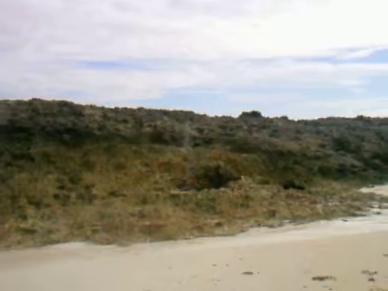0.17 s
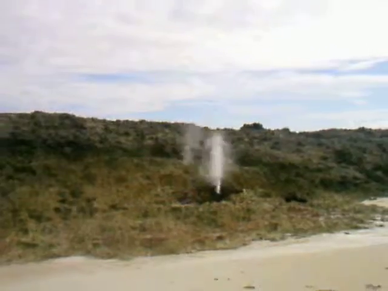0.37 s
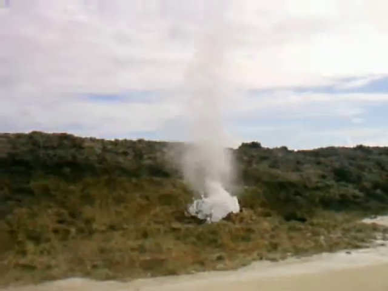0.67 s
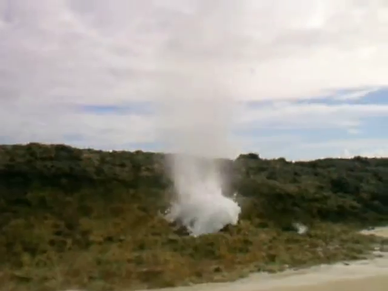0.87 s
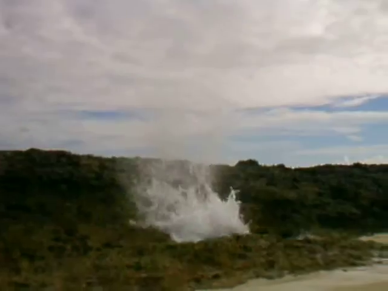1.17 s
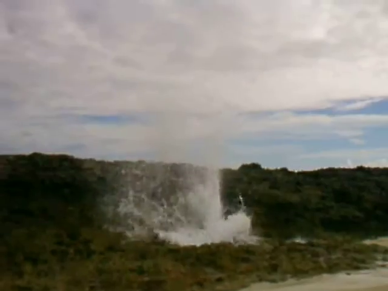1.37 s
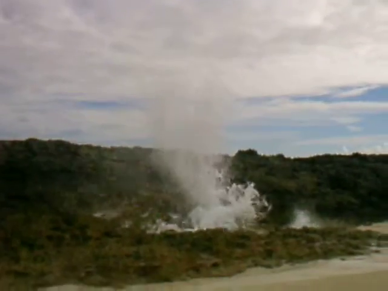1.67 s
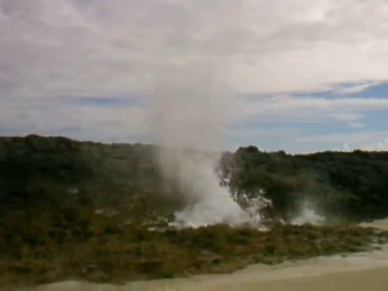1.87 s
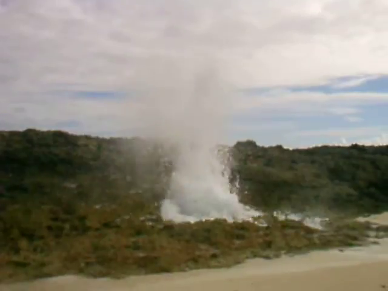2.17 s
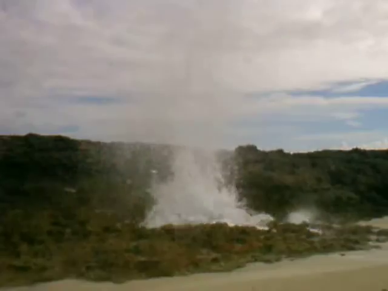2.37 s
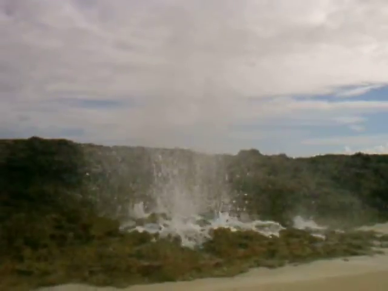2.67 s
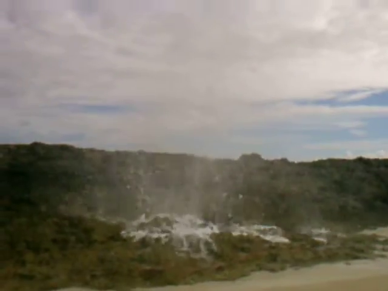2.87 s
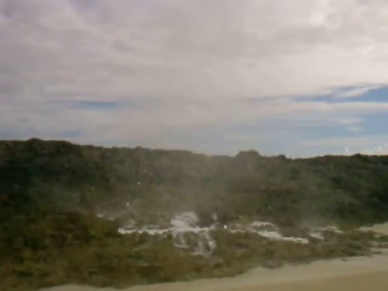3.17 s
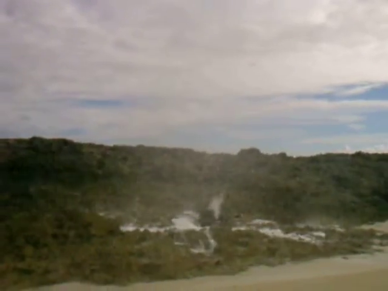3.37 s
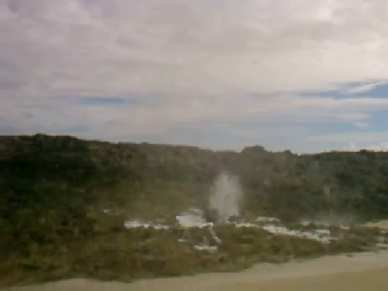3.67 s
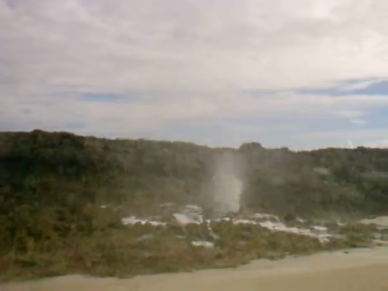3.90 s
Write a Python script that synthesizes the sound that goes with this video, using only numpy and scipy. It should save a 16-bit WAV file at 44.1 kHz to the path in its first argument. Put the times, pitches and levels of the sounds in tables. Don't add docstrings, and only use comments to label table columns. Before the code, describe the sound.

Muffled surf, then two windy, gurgling blasts of air and water from a rocky vent, fading into crisp pattering spray.

```python
import sys
import numpy as np
from scipy import signal
from scipy.io import wavfile
from scipy.ndimage import uniform_filter1d

SR = 44100
rng = np.random.default_rng(int(sys.argv[2]) if len(sys.argv) > 2 else 0)


def invert_db(level):
    return 10 ** (np.asarray(level, dtype=float) / 20)


def store_pcm(level_fs):
    pcm = np.round(np.clip(level_fs, -1, 1) * 32767).astype(np.int16)
    wavfile.write(sys.argv[1], SR, np.atleast_2d(pcm).T)


N = 177943

# pitch in Hz, strength in dB per Hz.
SEA_SPECTRUM = [(24, -44.5), (40, -7), (193, -5.5), (330, -4), (421, -2), (492, -6), (1680, -11),
                (2500, -26.5), (3250, -58), (5500, -120)]
# pitch in Hz, strength in dB per Hz.
SURGE_SPECTRUM = [(13, -49), (22, -27), (52, 10.5), (150, 6), (200, -25.5), (330, -120)]
# pitch in Hz, strength in dB per Hz.
BOOM_SPECTRUM = [(65, -41), (110, -8), (210, 0), (263, -4.5), (436, -10), (543, -30), (600, -27.5),
                 (780, -49), (1320, -120)]
# pitch in Hz, strength in dB per Hz.
SPRAY_SPECTRUM = [(1000, -27), (1700, 0), (1900, 0), (2050, 1.5), (2230, -3.5), (2400, 0), (2760, -1.5),
                  (3580, 1.5), (3780, 4), (3980, -5), (4270, -14.5), (4450, -29), (4750, -51.5),
                  (6180, -84), (10400, -120)]
# pitch in Hz, strength in dB per Hz.
JET_SPECTRUM = [(330, -34), (560, -11), (659, -8), (918, -4.5), (1090, -8), (1780, -11.5), (2500, -24.5),
                (3250, -41.5), (5500, -120)]
# pitch in Hz, width in Hz, lift in dB.
THROAT_LIFTS = [(688, 45, 6), (1230, 50, 3), (1510, 80, 3), (1733, 40, 5)]
# pitch in Hz, width in Hz, level in dB.
VENT_NOTES = [(905, 40, 0), (950, 40, 0), (1035, 24, 2), (1172, 40, -4)]

# time in seconds, pressure in dB.
SHAFT_PRESSURE = [(.12, -36), (.3, -26), (.4, -24.5), (.58, -22), (.68, -19.5), (.95, -22.5), (1.01, -27.5),
                  (1.17, -25.5), (1.6, -23), (1.77, -26.5), (2.04, -25), (2.549, -34), (3.0, -35),
                  (3.4, -31.5), (3.58, -35), (3.68, -39), (3.9, -42.5), (4.03, -35.5)]
# middle in seconds, lift in dB, length in seconds.
HEAVES = [(0.211, 9, 0.11), (0.505, 3.5, 0.31), (.9, 3, 0.13), (1.177, 9.5, 0.11), (1.572, 4, 0.069),
          (.68, -1.5, .1), (1.717, 5, 0.096), (1.894, 10, 0.11), (2.098, -11.5, 0.13), (2.19, 3, .07),
          (2.777, -5, 0.059), (3.25, 3.5, 0.1)]
# middle in seconds, peak level in dB, pitch in Hz.
SLUGS = [(0.328, -16, 157), (0.353, -18, 155), (0.429, -17, 195), (0.543, -15, 195), (0.576, -14, 179),
         (0.626, -10, 210), (0.665, -12, 192), (0.688, -11, 208), (0.716, -14, 217), (0.775, -13, 200),
         (0.809, -12, 202), (0.887, -16, 200), (0.912, -15, 210), (0.936, -14, 181), (1.15, -17, 189),
         (1.172, -16, 206), (1.233, -14, 168), (1.297, -15, 182), (1.408, -14, 202), (1.592, -13, 196),
         (1.626, -16, 192), (1.661, -16, 209), (1.904, -18, 186), (1.946, -18, 192), (1.971, -18, 204),
         (2.123, -15, 223), (2.273, -22, 198), (3.114, -24, 201), (3.442, -25, 234), (3.571, -25, 179)]
# middle in seconds, peak level in dB, pitch in Hz, number of cycles.
THUDS = [
    (0.288, -18.5, 98, 3),
    (0.325, -11, 103, 3),
    (0.676, -16, 97, 2.7),
    (1.24, -20.5, 104.4, 3),
    (2.189, -24.5, 99, 3),
    (1.369, -13, 191, 8.5),
    (1.529, -13.5, 189, 5.7),
    (2.002, -19, 203, 5.4),
    (2.653, -25, 204, 6),
]
# start in seconds, peak level in dB, pitch in Hz.
CLOSE_DROPS = [(2.3864, -33, 3420), (2.5819, -32, 3770), (2.6503, -32, 3690), (2.7361, -31, 3660),
               (2.755, -28, 3730), (2.994, -29, 3500), (3.0149, -31, 3110), (3.1052, -30, 3550),
               (3.1611, -31, 2970), (3.2539, -26, 3450), (3.3093, -35, 3150), (3.3212, -34, 3600),
               (3.3377, -31, 3590), (3.3761, -33, 3700), (3.4684, -31, 3090), (3.5238, -31, 3060),
               (3.5517, -31, 3800), (3.5936, -24, 3520), (3.662, -32, 3660), (3.9194, -33, 3610),
               (3.9393, -32, 3160), (3.9837, -28, 3630)]
# full force in seconds, letting go in seconds, force in dB,
# build-up in dB per second, dying away in dB per second.
SHOWERS = [
    (2.2, 2.4, -13, 1, 25.5),
    (3.05, 3.3, 0, 11, 19),
    (3.96, 3.99, -7, 29.5, 38),
]
# full force in seconds, letting go in seconds, force in dB,
# build-up in dB per second, dying away in dB per second.
BURSTS = [
    (0.46, 0.79, -2.5, 82.5, 72),
    (1.457, 1.98, -1.5, 23.5, 23),
    (0.71, .78, 1, 46, 154),
    (2.7, 3.38, -11.5, 14, 44),
]
# full force in seconds, letting go in seconds, force in dB,
# build-up in dB per second, dying away in dB per second.
SONGS = [
    (.25, .4, -8, 100, 51),
    (.52, .6, 2, 45.5, 119.5),
    (.77, 1.28, 1.5, 150.5, 104.5),
    (1.44, 2.34, 2, 59.5, 84),
    (3.03, 3.38, -4.5, 150, 81.5),
    (3.56, 3.6, -9.5, 101, 75),
]

SEA_DB = -39.5
LULL_DB, LULL_ENDS_S = -4, 0.36
CALM_DB = -25
SURGE_DB, SURGE_FOLLOWS, BOOM_DB = -35.5, 0.85, -26
SLUG_CYCLES = 4
MIST_DB, MIST_FOLLOWS, RAIN_DB, DRIZZLE_DB = -37.5, 0.95, -39, -55.5
PATTER_SHARE = 0.18
DROP_TOP_HZ = 4274
SAG_DB_PER_S = 5.5
ROAR_DB, LEAK_DB, LEAK_FOLLOWS = -29.5, -37.5, 0.73
RING_DB, HUM_DB = -36.5, -61.5
BAND_HZ, EDGE_HZ = 4560, 16600
ON_S = 3199.6 / 44100
JOLT, DRAIN_S, OFFSET = -.43, .262, -.004


def evened(x):
    return x / np.sqrt(np.mean(x ** 2) + 1e-20)


def read(points, at):
    hz, value = np.transpose(points)
    return np.interp(np.log(at + 1), np.log(hz + 1), value)


def add(mix, s, sound):
    part = mix[round(s * SR):][:len(sound)]
    part += sound[:len(part)]


def turbulence(colour_db, size, patchy_db, flicker_db):
    frames = 4 * N // size + 5
    real, imag, patches = rng.standard_normal((frames, size // 2 + 1, 3)).T
    patches = uniform_filter1d(patches, size=size // 128, axis=0)
    patches = evened(uniform_filter1d(patches, size=8, axis=1))
    flicker = evened(uniform_filter1d(rng.standard_normal(frames), size=3))
    hz = np.fft.rfftfreq(size, 1 / SR)
    level_db = colour_db(hz)[:, None] + patchy_db * patches + flicker_db * flicker
    z = (real + 1j * imag) * invert_db(level_db)
    return evened(signal.istft(z, nperseg=size, noverlap=3 * size // 4)[1][:N])


def steadied(x, size):
    sway = np.sqrt(uniform_filter1d(uniform_filter1d(x ** 2, size), size) + 1e-9)
    return evened(x / sway ** .7)


def blip(hz, turns):
    t = np.arange(round(turns * SR / hz)) / SR
    envelope = np.sin(np.pi * t * hz / turns) ** 2
    return -np.cos(2 * np.pi * hz * t - np.pi * turns) * envelope


def pressure():
    return np.interp(np.arange(N) / SR, *np.transpose(SHAFT_PRESSURE)) - CALM_DB


def gushes(rows):
    t = np.arange(N) / SR
    full, ends, force_db, rise, fall = np.transpose(rows)[:, :, None]
    held = np.clip(t - full, 0, np.maximum(ends - full, 0))
    db = force_db - rise * np.maximum(full - t, 0) - SAG_DB_PER_S * held - fall * np.maximum(t - ends, 0)
    return np.sqrt(np.sum(invert_db(db) ** 2, axis=0))


def lull():
    remaining = np.clip(1 - np.arange(N) / SR / LULL_ENDS_S, 0, 1)
    return invert_db(LULL_DB * remaining ** .5)


def sea():
    wash = turbulence(lambda hz: read(SEA_SPECTRUM, hz), size=1024, patchy_db=0.8, flicker_db=1.0)
    return invert_db(SEA_DB) * lull() * steadied(wash, size=600)


def cave():
    surge = turbulence(lambda hz: read(SURGE_SPECTRUM, hz), size=2048, patchy_db=.9, flicker_db=.6)
    t = np.arange(N) / SR
    heave_db = sum(db * np.exp(-(2 * (t - s) / length) ** 2) for s, db, length in HEAVES)
    return invert_db(SURGE_DB + SURGE_FOLLOWS * pressure() + heave_db) * steadied(surge, size=4000)


def shaft():
    boom = turbulence(lambda hz: read(BOOM_SPECTRUM, hz), size=1024, patchy_db=.8, flicker_db=.3)
    throbs, choked = np.zeros((2, N))
    for s, db, hz, turns in [(*slug, SLUG_CYCLES) for slug in SLUGS] + THUDS:
        throb = blip(hz, round(turns))
        start = s - .5 * len(throb) / SR
        add(throbs, start, invert_db(db - .8) * throb)
        add(choked, start, np.hanning(len(throb)))
    flow = 1 - .5 * np.minimum(choked, 1)
    return invert_db(BOOM_DB + pressure()) * flow * steadied(boom, size=1500) + throbs


def patter():
    sizes = invert_db(3.9 * np.minimum(rng.exponential(1, N), 4))
    sizes = sizes * (rng.random(N) < 450 / SR)
    kind = rng.integers(0, 12, N)
    out = np.zeros(N)
    for k, hz in enumerate(np.linspace(2900, 3950, num=12)):
        out += signal.oaconvolve(sizes * (kind == k), blip(hz, turns=6))[:N]
    return evened(out)


def spray():
    hiss = turbulence(lambda hz: read(SPRAY_SPECTRUM, hz), size=512, patchy_db=0.5, flicker_db=1.35)
    mist = invert_db(MIST_DB) * gushes(BURSTS[:2]) ** MIST_FOLLOWS
    rain = invert_db(RAIN_DB) * gushes(SHOWERS)
    drizzle = invert_db(DRIZZLE_DB) * lull()
    fine = np.sqrt(mist ** 2 + (1 - PATTER_SHARE) * rain ** 2 + drizzle ** 2)
    drops = np.sqrt(PATTER_SHARE) * rain * patter()
    for s, db, hz in CLOSE_DROPS:
        add(drops, s, invert_db(db - .5) * blip(min(hz, 3900), turns=6))
    dull = signal.firwin(numtaps=301, cutoff=DROP_TOP_HZ, window=("kaiser", 8), fs=SR)
    return fine * hiss + signal.oaconvolve(drops, dull, "same")


def vent_note(mid, width, db):
    def colour_db(hz):
        return -20 * np.log10(1 + (2 * (hz - mid) / width) ** 2)

    tone = turbulence(colour_db, size=8192, patchy_db=.3, flicker_db=.3)
    return invert_db(db) * steadied(tone, size=1500)


def jet():
    def roar_db(hz):
        lifts = sum(db / (1 + (2 * (hz - mid) / width) ** 2) for mid, width, db in THROAT_LIFTS)
        return read(JET_SPECTRUM, hz) + lifts

    roar = turbulence(roar_db, size=2048, patchy_db=.6, flicker_db=.5)
    ring = evened(sum(vent_note(*row) for row in VENT_NOTES))
    leak = invert_db(LEAK_DB + LEAK_FOLLOWS * pressure())
    rush = np.hypot(invert_db(ROAR_DB) * gushes(BURSTS), leak)
    singing = np.hypot(invert_db(RING_DB) * gushes(SONGS), invert_db(HUM_DB))
    return rush * roar + singing * ring


def scene():
    return (sea() + cave() + shaft() + spray() + jet())[None]


def low_pass(x):
    return signal.sosfilt(signal.butter(12, 17070, fs=SR, output="sos"), x)


def record(dry):
    band = signal.firwin(401, BAND_HZ, window=("kaiser", 12), fs=SR)
    narrow = signal.oaconvolve(dry, band[None], "same")
    since = np.arange(N) / SR - ON_S
    opened = np.clip(since * SR + .5, 0, 1)
    wired = opened * (narrow + JOLT * np.exp(-since / DRAIN_S) + OFFSET)
    edge = signal.firwin(255, EDGE_HZ, window=("kaiser", 9), fs=SR)
    mix = signal.oaconvolve(wired, edge[None], "same")
    return low_pass(mix)


dry = scene()
out = record(dry)
store_pcm(out)
```